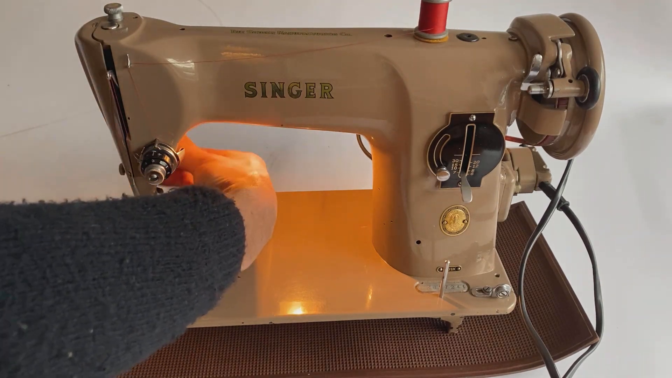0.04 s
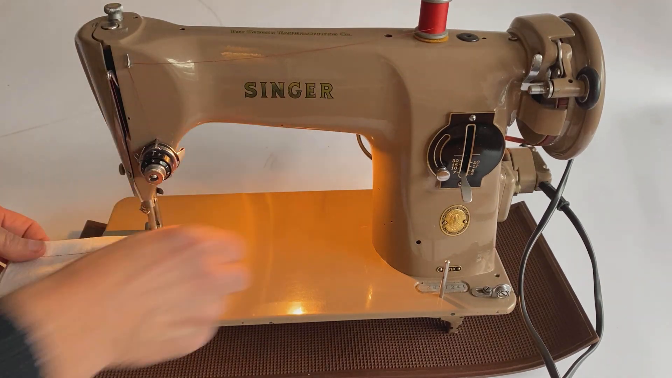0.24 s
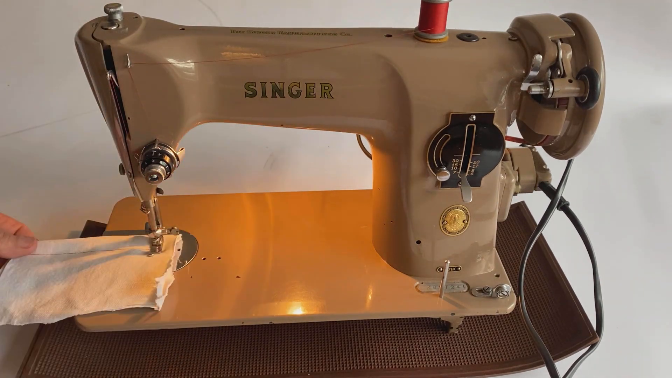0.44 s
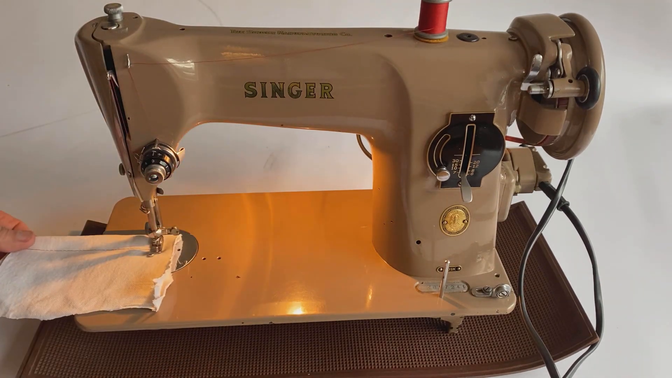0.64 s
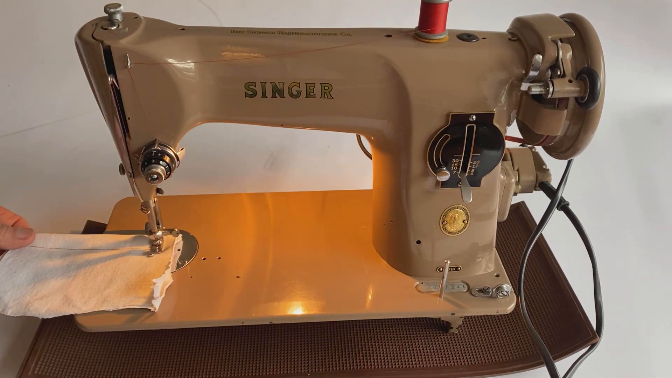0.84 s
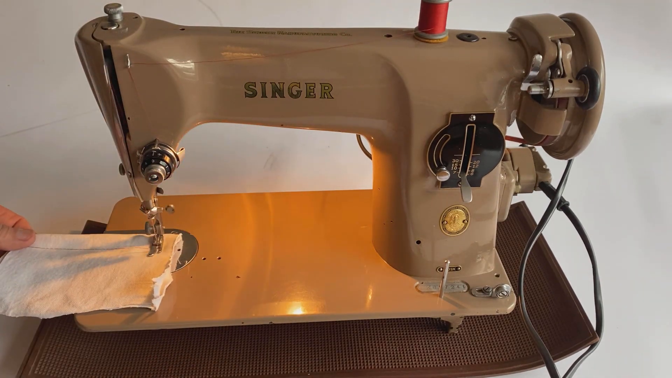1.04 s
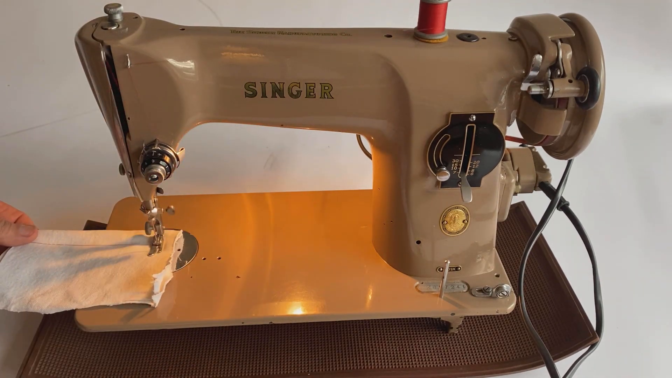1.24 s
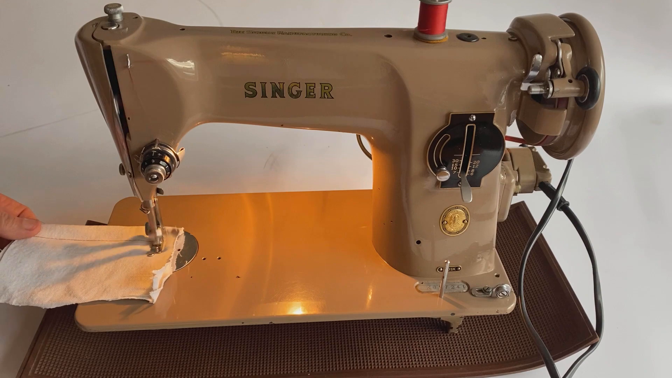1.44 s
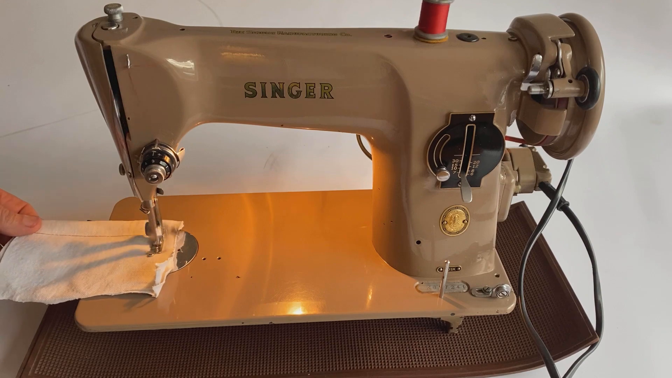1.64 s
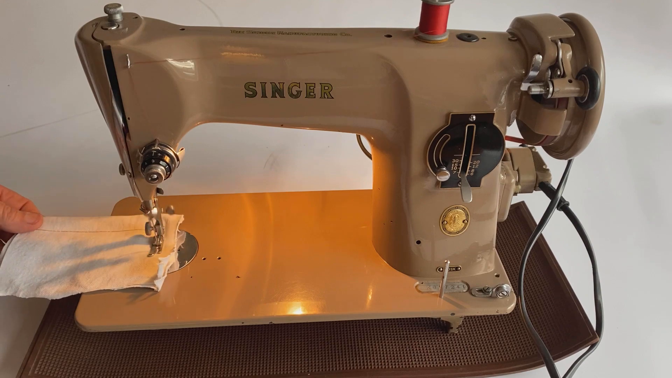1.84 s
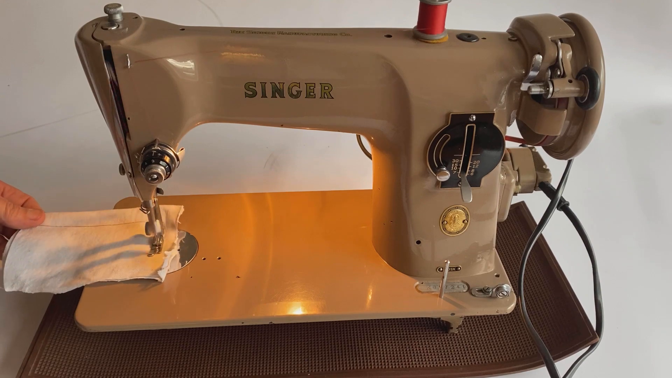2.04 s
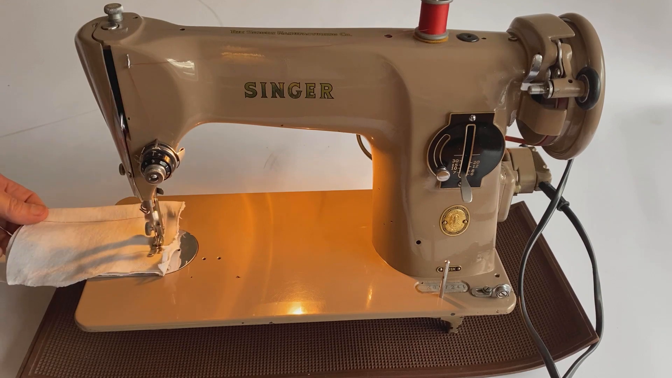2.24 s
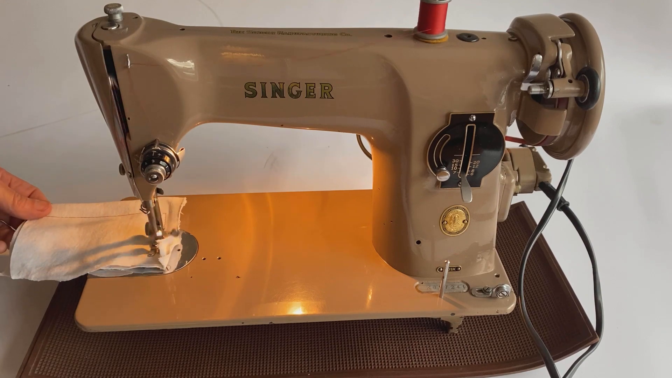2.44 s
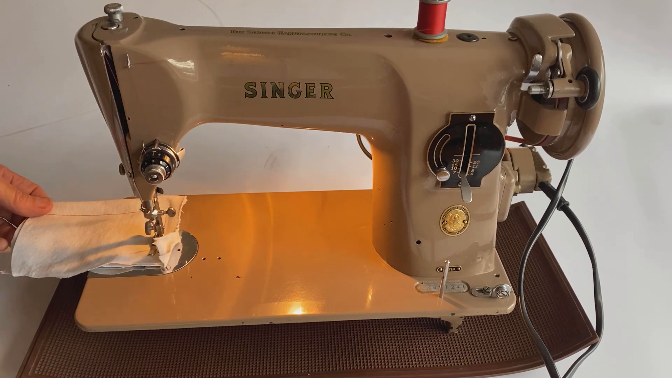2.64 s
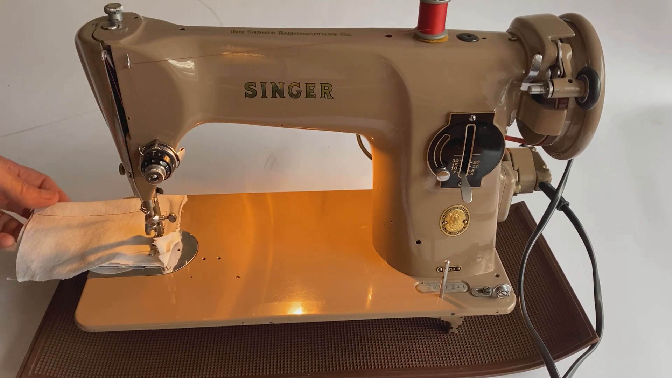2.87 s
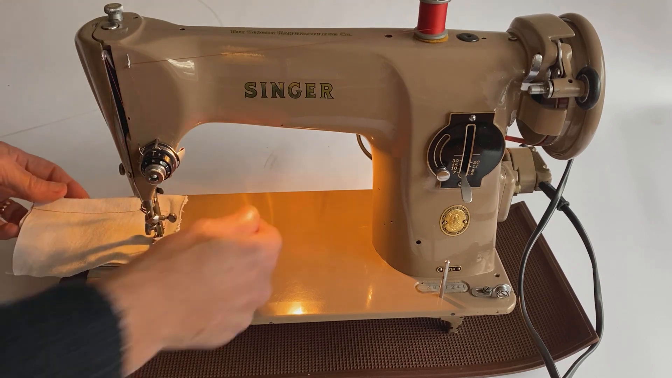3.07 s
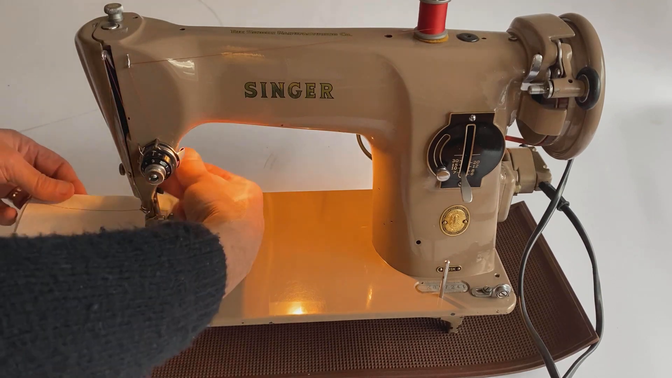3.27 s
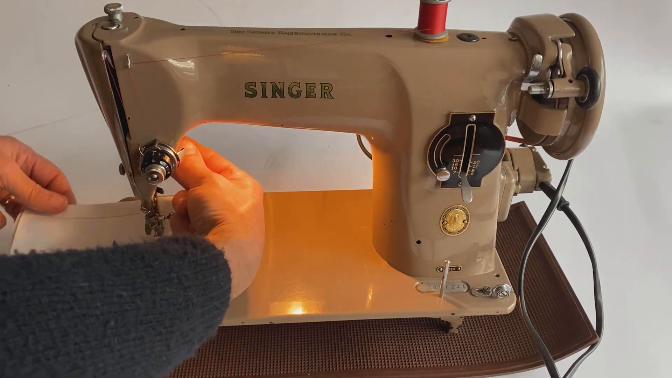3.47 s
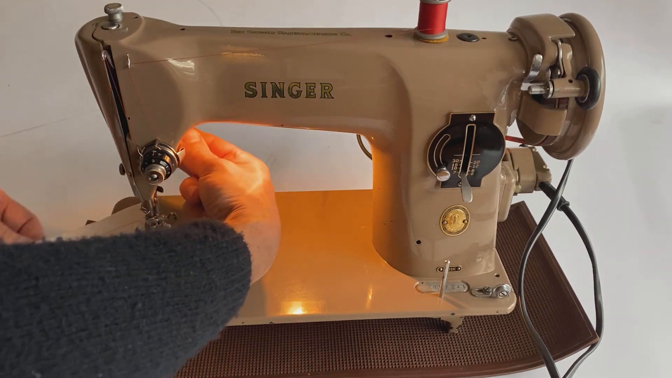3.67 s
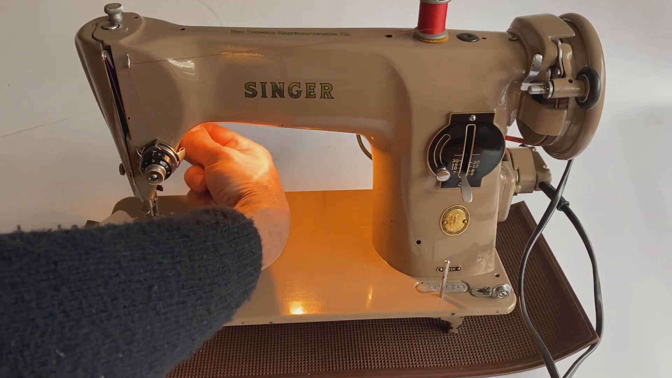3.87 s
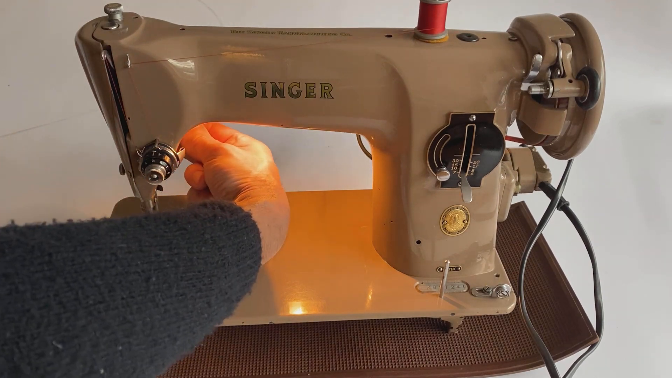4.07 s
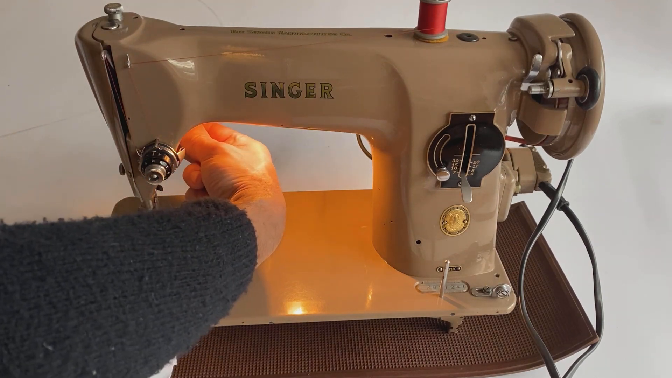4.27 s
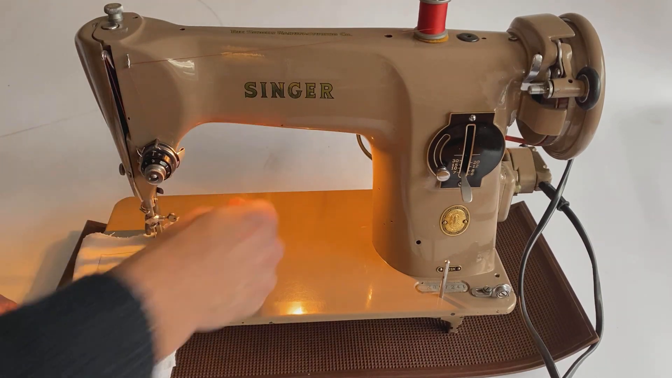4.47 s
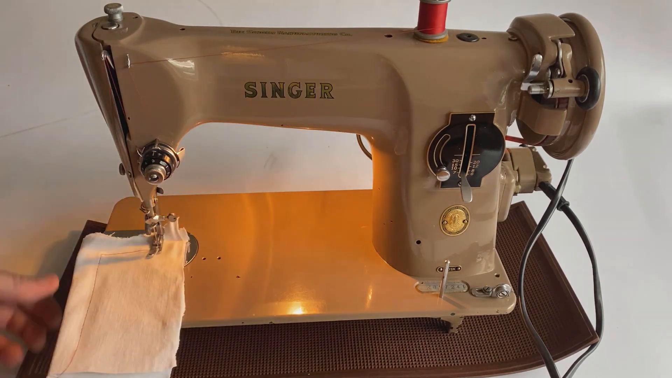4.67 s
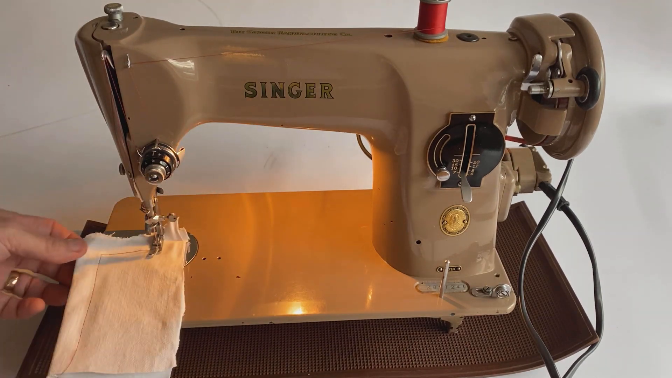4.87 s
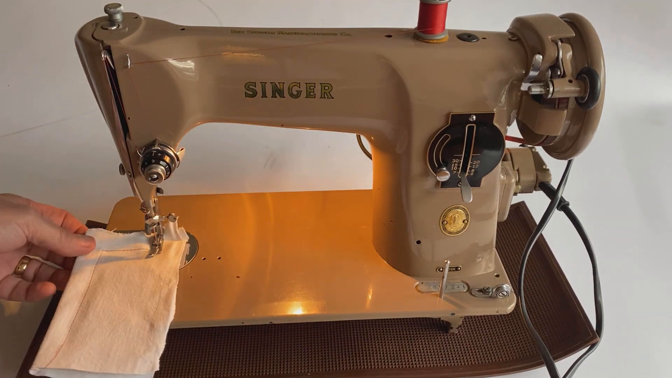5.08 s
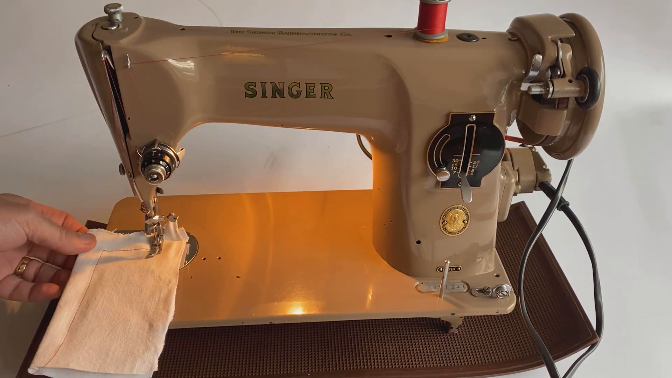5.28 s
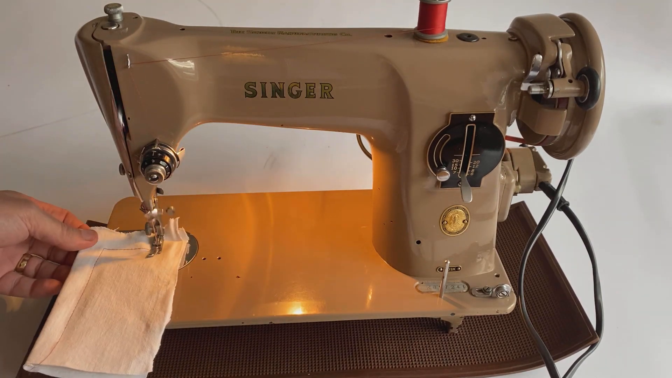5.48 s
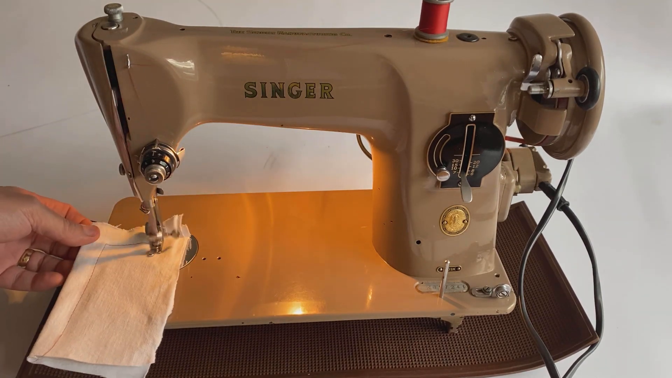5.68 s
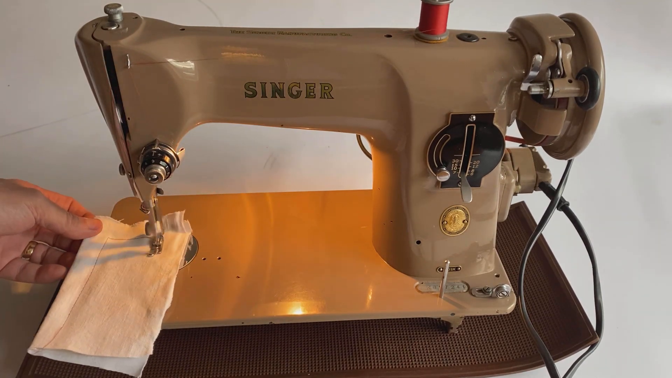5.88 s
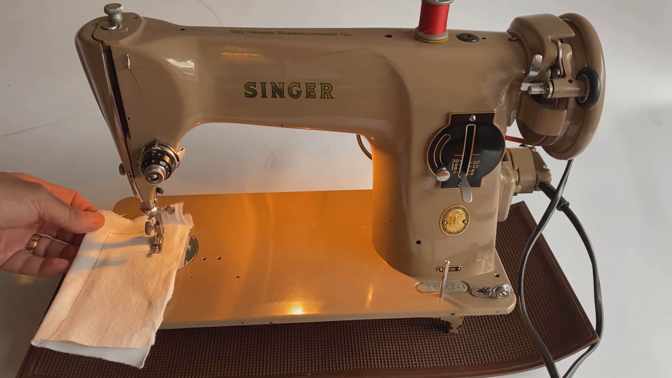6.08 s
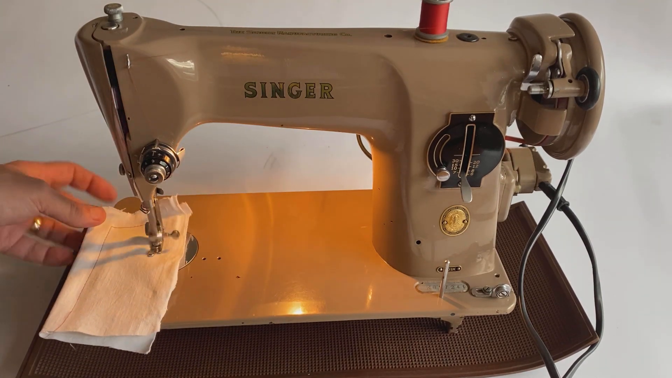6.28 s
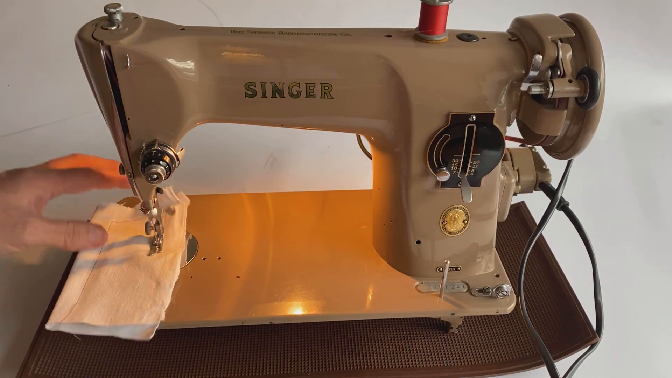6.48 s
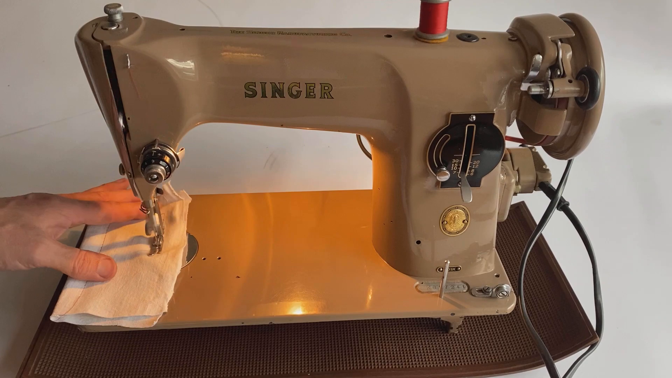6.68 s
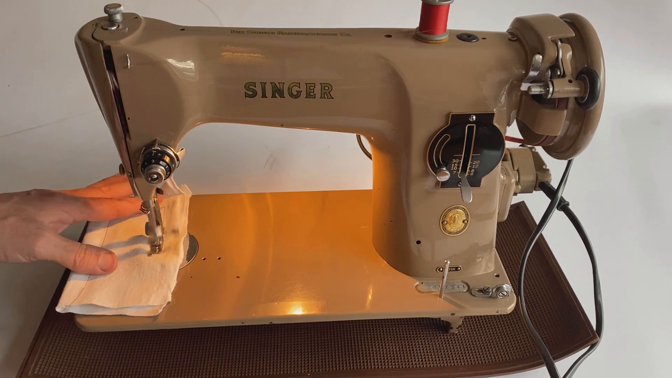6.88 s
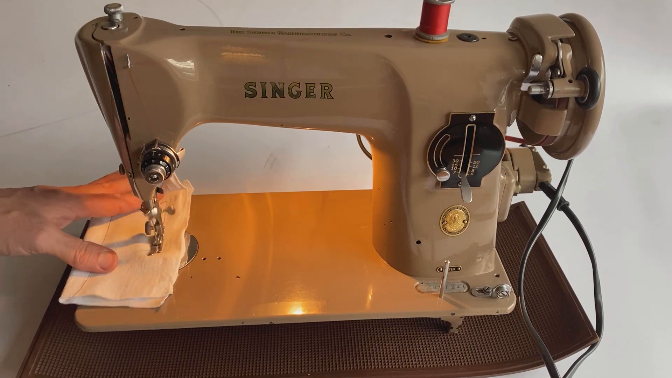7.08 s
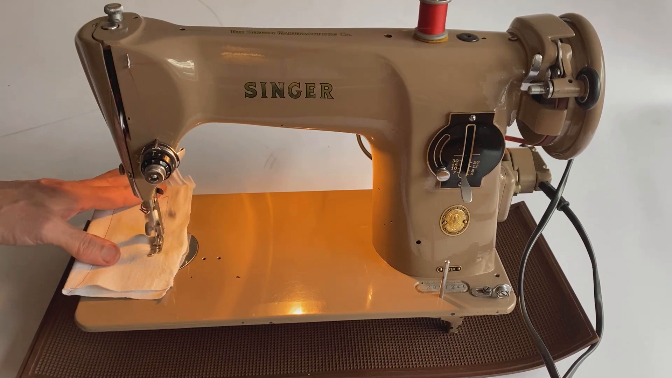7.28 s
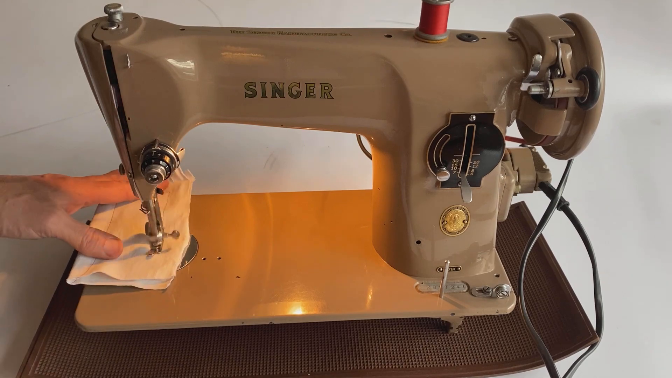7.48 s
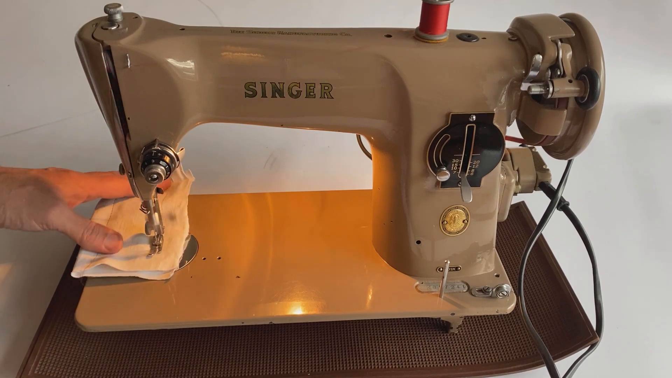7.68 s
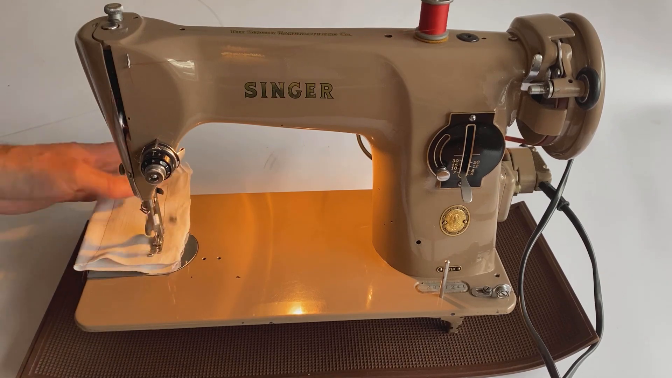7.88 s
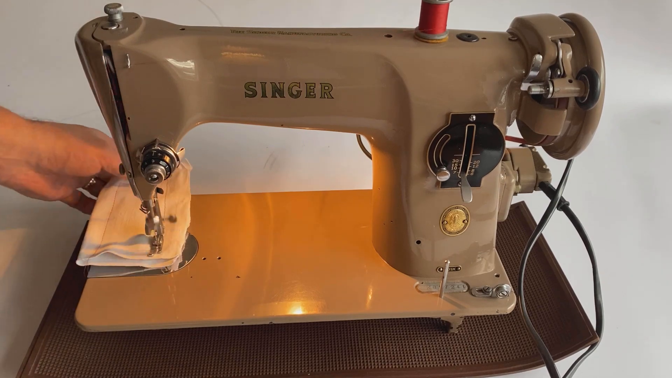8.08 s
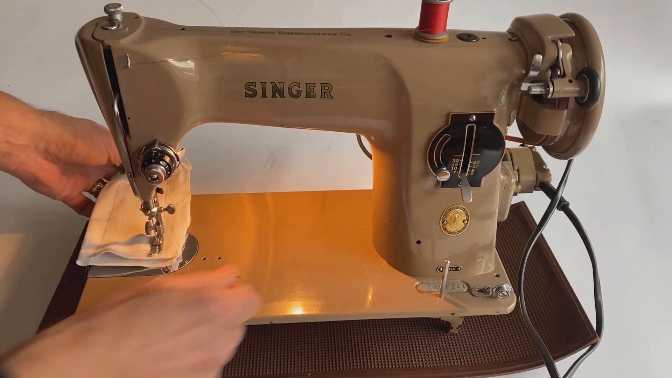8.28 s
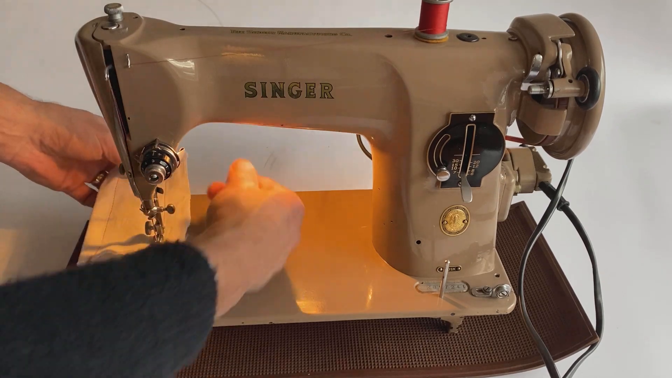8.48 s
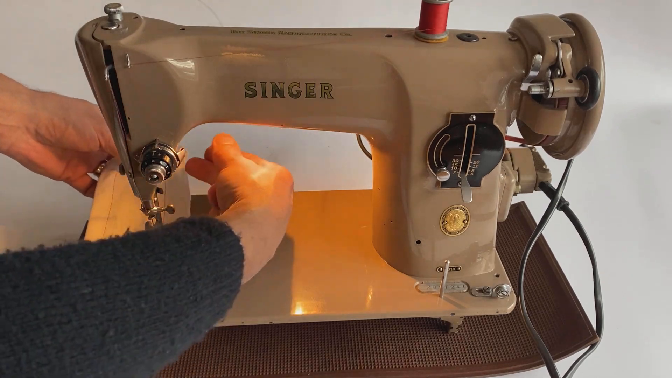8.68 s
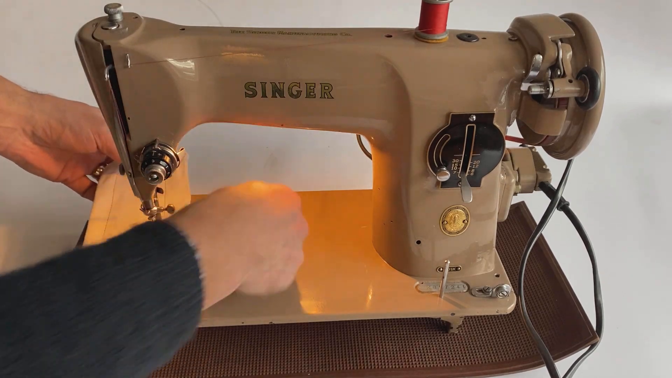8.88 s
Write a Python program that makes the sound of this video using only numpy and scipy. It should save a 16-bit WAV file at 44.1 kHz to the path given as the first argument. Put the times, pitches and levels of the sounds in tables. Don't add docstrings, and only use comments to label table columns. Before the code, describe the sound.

In a small room, heard close in stereo, a hand bumps a metal sewing machine bed and a lever clacks. A switch clicks and a short seam gathers speed with needle ticks, table thumps, gear rattle and motor whir, then snaps off and coasts down. Soft handling and cloth rustle follow, then a longer, faster seam, a loud release snap, a rundown and cloth drawn away.

```python
import sys
import numpy as np
from scipy import signal
from scipy.fft import rfft, irfft, next_fast_len
from scipy.io import wavfile
from scipy.ndimage import uniform_filter1d

SR = 44100
rng = np.random.default_rng(int(sys.argv[2]) if len(sys.argv) > 2 else 0)


def digitize_waveform(pressure):
    field = np.atleast_2d(pressure).T
    bounded = np.clip(field, -1, 1)
    quanta = np.round(bounded * 32767).astype(np.int16)
    wavfile.write(sys.argv[1], SR, quanta)


def attenuation_scalar(level_db):
    decades = np.asarray(level_db, float) / 20
    return 10 ** decades


N = 393372
SIZE = next_fast_len(N)
FULL_SPEED = 13

# (power on [s], power off [s], strain ends [s], buzz level [dB])
PEDAL = [
    (0.829, 2.261, 1.9, -48.5),
    (5.34, 7.842, 5.85, -42.5),
]
# (time [s], tick level [dB], lower ring re tick [dB])
TICKS = [(0.9703, -35.5, -13), (1.115, -29, -8), (1.3019, -26.5, -15.5), (1.454, -20, -15.5),
         (1.5627, -22.5, -12), (1.6617, -29.5, -14.5), (1.6646, -19, -25), (1.7544, -21, -12),
         (1.8412, -27, -12), (1.926, -24.5, -13), (2.0083, -25.5, -12.5), (2.0888, -26, -14),
         (2.126, -28, -14.5), (2.156, -21, -19), (2.1744, -17, -9.5), (2.2373, -20, -23.5),
         (2.3305, -23, -18), (2.4504, -24.5, -16), (2.6572, -29.5, -9), (2.713, -37, -11),
         (5.3707, -32.5, -14), (5.5194, -30.5, -13), (5.56, -30, -4.5), (5.6978, -26.5, -10.5),
         (5.8055, -25.5, -13.5), (5.894, -32, -9), (5.9796, -32.5, -3.5), (6.0701, -24, -8.5),
         (6.1511, -30, -12), (6.2324, -30, -8), (6.3133, -33, -2.5), (6.3295, -31, -6.5),
         (6.3931, -22.5, -17.5), (6.4691, -25.5, -7), (6.4746, -25.5, -10), (6.5533, -21, -14),
         (6.6234, -23.5, -13), (6.6989, -26, -14.5), (6.7615, -30, -14.5), (6.7768, -24.5, -15.5),
         (6.8495, -27, -11.5), (6.929, -20.5, -19.5), (7.001, -24, -16.5), (7.0593, -26, -14.5),
         (7.0751, -28.5, -11), (7.1506, -31.5, -10), (7.233, -22.5, -20), (7.2963, -22, -11),
         (7.3761, -18, -15), (7.4456, -22.5, -15.5), (7.5195, -20, -15.5), (7.5946, -27, -4.5),
         (7.6648, -23, -13.5), (7.736, -22, -15), (7.7511, -23.5, -18), (7.8134, -28, -6),
         (7.8898, -30.5, -1), (7.9881, -32.5, -6.5), (8.114, -24.5, -12.5), (8.1984, -35, -17.5)]
# (frequency [Hz], density [dB per Hz])
FIZZ = [(6000, -19.5), (8500, -5.5), (10000, -4), (12500, -1.5), (14000, -4.5), (15500, -19), (17000, -44)]
# (level at full speed [dB], slope under power [dB per dB of speed],
# slope coasting [dB per dB of speed], step at power off [dB])
BRUSHES = (-42, 0.45, 0.48, 5.5)


def evened(x):
    return x / np.sqrt(np.mean(x ** 2) + 1e-20)


def read(points, hz):
    f, value = np.transpose(points)
    return np.interp(np.log(hz + 1), np.log(f + 1), value)


def coloured(x, points, peaks=()):
    hz = np.fft.rfftfreq(SIZE, 1 / SR)
    lift = 1 + sum(attenuation_scalar(top_db) / np.sqrt(1 + (2 * (hz - f) / w) ** 4) for f, w, top_db in peaks)
    spectrum = rfft(x, SIZE) * attenuation_scalar(read(points, hz)) * lift
    return evened(irfft(spectrum, SIZE)[:N])


def train(seconds, gains):
    out = np.zeros(N)
    at = np.clip(np.round(seconds * SR).astype(int), 0, N - 1)
    np.add.at(out, at, gains)
    return out


def grains(per_s, spread_db, smooth):
    draws = rng.random((12000 * N // SR, 3))
    at, size, sign = draws[:int(min(per_s, 12000) * N / SR)].T
    height = attenuation_scalar(spread_db * np.minimum(-np.log(size + 1e-9), 5))
    knocks = train(at * N / SR, height * np.sign(sign - .5))
    return evened(knocks) + smooth * rng.standard_normal(N)


def ring(modes, rise):
    t = np.arange(SR // 3) / SR
    x = sum(attenuation_scalar(db - 60 * t / t60) * np.sin(2 * np.pi * hz * t) for hz, db, t60 in modes)
    x = x * (1 - np.exp(-t / rise))
    return x / abs(x).max()


def struck(blows, response):
    return signal.oaconvolve(blows, response)[:N]


def bursts(seconds, db, rise, t60):
    t = np.arange(SR // 5) / SR
    shape = (1 - np.exp(-t / rise)) * attenuation_scalar(-60 * t / t60)
    shape = shape / shape.max()
    out = np.zeros(N + len(t))
    for at, gain in zip(np.round(seconds * SR).astype(int), attenuation_scalar(db) * np.ones(len(seconds))):
        out[at:at + len(t)] += gain * shape
    return out[:N]


def shaft():
    # (time [s], speed [stitches per s])
    seam_speeds = [
        [(.84, 2.483), (1.252, 4.848), (1.456, 8.037), (1.63, 10.419), (1.991, 12.276), (2.264, 12.629),
         (2.395, 8.6), (2.56, 4.4), (3.0, .03)],
        [(5.33, 4.458), (5.67, 6.398), (5.772, 10.194), (6.101, 12.167), (6.67, 13.278), (7.877, 13.671),
         (8.07, 6.4), (8.2, 3.8), (8.64, .03)],
    ]
    first_counts = (-.076, 15.685)
    # (first seam [dB], second seam [dB])
    slack_db = (3, -6)
    slack_s, take_up_s, let_go_s = 0.041, 0.016, 0.061
    t = np.arange(N) / SR
    speed, turn, power, taken, stitches = np.zeros(N), np.zeros(N), np.zeros(N), np.zeros(N), []
    for rows, first, slack, (on, off, *_) in zip(seam_speeds, first_counts, slack_db, PEDAL):
        rows = np.transpose(rows)
        run = (t >= rows[0, 0]) & (t < rows[0, -1])
        speed[run] = np.interp(t[run], *rows)
        turn[run] = first + np.cumsum(speed[run]) / SR
        power[run] = np.clip((off - t[run]) / let_go_s + 1, 0, 1)
        whole = np.arange(np.ceil(first), turn[run][-1] + .31)
        stitches.append(np.interp(whole, turn[run], t[run]))
        grip = np.clip((t - on) / take_up_s, 0, 1) * (t < rows[0, -1])
        taken += grip * attenuation_scalar(slack * np.exp(-abs(t - on) / slack_s))
    return speed, turn, power, taken, np.hstack(stitches)


def law(layer, wake=(1, 1, 0), hush=1):
    stall_speed, stall_db = 2.07, -10
    speed, _, power, taken, _ = shaft()
    full_db, pull, coast, step_db = layer
    octaves = np.log2(speed / FULL_SPEED + 1e-6)
    lift_db = wake[2] * np.exp(-((octaves - np.log2(wake[0] / FULL_SPEED)) / wake[1]) ** 2)
    speed_db = 20 * np.log10(2) * octaves
    loss_db = hush * stall_db * (stall_speed / (speed + .1)) ** 2
    driven_db = power * pull * speed_db
    coasting_db = (1 - power) * (coast * speed_db + step_db)
    return taken * attenuation_scalar(full_db + loss_db + lift_db + driven_db + coasting_db)


def lurch(order):
    # (time [s], width [s], gears [dB], brushes [dB])
    lurches = [
        (1.0, 0.14, 1.5, 5),
        (1.42, 0.028, 3, 0),
        (5.376, 0.016, -1, 8),
        (5.455, 0.032, -2.5, -22),
        (5.56, 0.18, 3, 3),
    ]
    t = np.arange(N) / SR
    return attenuation_scalar(sum(row[order] * np.exp(-((t - row[0]) / row[1]) ** 2) for row in lurches))


def gear_drive():
    # (level at full speed [dB], slope under power [dB/dB], slope coasting [dB/dB], step at power off [dB])
    gear_law = (-32.5, 0.47, 0.58, -1.5)
    return law(gear_law, hush=2.1) * lurch(order=2)


def spin(turn):
    return 1 + 0.12 * np.cos(2 * np.pi * 9.0 * turn)


def stitch_load(turn):
    twice = 0.031 * np.cos(4 * np.pi * (turn - .1))
    once = 0.029 * np.cos(2 * np.pi * (turn - .3))
    return 1 + twice + once


def mesh():
    drift = uniform_filter1d(uniform_filter1d(rng.standard_normal(N), size=700), size=500)
    return attenuation_scalar(1.6 * evened(drift))


def gears(turn, drive):
    # (frequency [Hz], density [dB per Hz])
    rattle = [(180, -38), (300, -4.5), (354, -6.5), (510, -8.5), (1120, -8.5), (1220, -13), (1460, -4.5),
              (2950, -10), (3400, -19), (4200, -32), (5460, -50.5), (9240, -120)]
    # (frequency [Hz], width [Hz], lift [dB])
    casting = [(733, 200, -5), (1110, 120, -5), (1430, 78, -8.5), (2100, 48, -3.5), (2780, 220, -19.5),
               (2867, 280, -7.5)]
    noise = coloured(grains(per_s=1200, spread_db=3.5, smooth=0.55), rattle, casting)
    return attenuation_scalar(2.0) * mesh() * drive ** 1.139 * spin(turn) * stitch_load(turn) * noise


def motor(turn, drive):
    # (order [turns per stitch], level [dB])
    orders = [(3.9, -8), (5.55, -0.5), (11.1, -9.5), (16.65, -1.5), (27.75, -14)]
    # (frequency [Hz], level [dB])
    buzz_lines = [(100, -2.5), (200, -7.5), (400, -5.5)]
    # (full speed [dB], under power [dB/dB], coasting [dB/dB], step at power off [dB])
    housing_law = (-45, 0.13, 0.3, -6)
    # (speed [stitches per s], width [octaves], lift [dB])
    housing_wake = (4.5, 0.55, 9.5)
    # (first seam [s], second seam [s])
    warm_s = (0.08, 0.09)
    t = np.arange(N) / SR
    speed = shaft()[0] / FULL_SPEED
    whir = sum(attenuation_scalar(db) * np.sin(2 * np.pi * k * turn) for k, db in orders)
    strain, warm = np.zeros(N), np.ones(N)
    for (on, _, eased, db), build_s in zip(PEDAL, warm_s):
        strain += attenuation_scalar(db) * np.clip((t - on) / 0.1, 0, 1) ** 2 * np.clip((eased - t) / 0.17, 0, 1)
        warm *= np.where(t < on, 1, np.clip((t - on) / build_s, 0, 1) ** 2)
    buzz = sum(attenuation_scalar(db) * np.sin(2 * np.pi * hz * t) for hz, db in buzz_lines)
    buzz = buzz * (1 + 0.35 * np.sin(2 * np.pi * 3.0 * turn))
    housing = coloured(rng.standard_normal(N), [(200, -32.5), (300, 0), (450, -2), (600, -29.0)],
                       [(350.2, 18, 13), (470.7, 39, 5.0)])
    drone = warm * law(housing_law, housing_wake) * housing
    return attenuation_scalar(-7.0) * drive * speed ** 6.0 * whir + attenuation_scalar(3.0) * strain * buzz + drone


def bearings(turn, power):
    # (level at full speed [dB], slope under power [dB/dB], slope coasting [dB/dB], step at power off [dB])
    singing_law = (-37, 0.5, 0.33, -17)
    # (speed [stitches per s], width [octaves], lift [dB])
    bearing_wake = (2.7, 0.85, 14.5)
    # (frequency [Hz], width [Hz], lift [dB])
    bearing_peaks = [(1400, 37, 8.5), (2050, 70, 9), (2558, 110, 20), (2680, 120, 18.5), (2856, 80, 23),
                     (3075, 140, 11)]
    driven = power * law(singing_law) * lurch(order=2)
    coasting = (1 - power) * law(singing_law, bearing_wake, hush=0.4)
    noise = coloured(rng.standard_normal(N), [(100, -0.5), (4000, -5.5), (6000, -45.0)], bearing_peaks)
    return (driven + coasting) * stitch_load(turn) * mesh() * noise


def linkage_and_brushes(turn):
    # (level at full speed [dB], slope under power [dB/dB], slope coasting [dB/dB], step at power off [dB])
    linkage_law = (-40, 0.92, 0.77, -2.5)
    # (frequency [Hz], density [dB per Hz])
    hiss_spectrum = [(2500, -34.5), (3400, -1), (4000, -1.5), (5200, -1), (6500, -2), (8300, -6.5),
                     (9500, -10), (11000, -31)]
    s, tick_db, low_db = np.transpose(TICKS)
    hiss = law(linkage_law) * spin(turn) + bursts(s, tick_db + low_db - 8.5, 0.00098, 0.076)
    fizz = law(BRUSHES) * lurch(order=3) * spin(turn)
    fizz += bursts(s - .004, tick_db - 19.5, 0.0037, 0.076) + bursts(s, tick_db - 39.5, 0.0022, 0.24)
    out = np.zeros(N)
    for gain, spectrum in ((fizz, FIZZ), (hiss, hiss_spectrum)):
        out += gain * coloured(grains(per_s=5000, spread_db=2.5, smooth=0.093), spectrum)
    return out


def free_brushes():
    # (frequency [Hz], density [dB per Hz])
    sparkle = [(13200, -40.5), (14300, 0.5), (14900, -3.5), (15300, -39)]
    return attenuation_scalar(-19) * (1 - shaft()[2]) * law(BRUSHES) * coloured(rng.standard_normal(N), sparkle)


def bent(modes, u):
    return [(hz * (1 + 0.036 * (u - .5)), db, t60) for hz, db, t60 in modes]


def needle():
    # (frequency [Hz], level [dB], t60 [s])
    needle_top = [(13600, -3.5, 0.0091), (12000, -5.5, .006), (13600, -12, 0.0027), (11220, -10.5, 0.008)]
    needle_low = [(7180, -2.5, 0.008), (5300, -5, .01), (4240, -2.5, 0.012), (7900, -9, .006)]
    out, draws = np.zeros(N), rng.random((len(TICKS), 8))
    for (s, db, low_db), u in zip(TICKS, draws):
        tick = ring(bent(needle_top, u[0]), 0.0005)
        tick = tick + attenuation_scalar(low_db + 7.5) * ring(bent(needle_low, u[1]), 0.00058)
        chatter = [(0, 0), (-.005 * u[2], -11 - 6 * u[3]),
                   (0.0044 * u[4], -11 - 6 * u[5]), (.018 * u[6], -14 - 6 * u[7])]
        for late, loose_db in chatter:
            out[round((s + late) * SR):][:len(tick)] += attenuation_scalar(db + loose_db - 2.5) * tick
    return out


def strokes():
    # (level at full speed [dB], slope under power [dB/dB], slope coasting [dB/dB], step at power off [dB])
    thump_law = (-23, 1.37, 1.54, 0.5)
    # (time [s], thump [dB], upper table modes [dB])
    uneven = [(1.352, 0, -1), (1.487, 7.5, -0.5), (1.594, 11.5, -5), (1.692, -1.5, 2), (1.783, 4, -2),
              (1.87, 6.5, -2), (1.955, -5.5, 3), (2.036, -1, 1), (2.117, -12.5, -1.5), (2.196, 6.5, -9.5),
              (2.37, -2, -2), (2.499, 8.5, -0.5), (2.76, -16, 1.5), (5.584, -2, 3.5), (5.832, 4, -6),
              (5.925, 0, 4), (6.012, -1, 2), (6.097, 3, -3), (6.179, -2.5, -2.5), (6.259, 6.5, -1),
              (6.338, 6, -1), (6.417, 4, -11), (6.495, 1.5, -7.5), (6.571, 1, 1.5), (6.648, 3.5, -3.5),
              (6.724, 0, -2.5), (6.8, 0, 1), (6.874, 6, -2.5), (6.949, -1.5, 5.5), (7.024, -2.5, 3),
              (7.098, 2, 0), (7.172, -7, 0), (7.246, 2, -2.5), (7.32, 6.5, -1.5), (7.394, 3, -1.5),
              (7.468, -6, 3), (7.542, -3.5, 2.5), (7.615, 2.5, 1), (7.689, 1, 0), (7.762, -7, 0.5),
              (7.916, 0.5, 0.5), (8.005, -9.5, 0.5), (8.167, 9.5, 2.5), (8.64, -13, 0)]
    times, rows = shaft()[4], np.array(uneven)
    extra_db = np.zeros((len(times), 2))
    extra_db[abs(times[:, None] - rows[:, 0]).argmin(0)] = rows[:, 1:]
    gain = law(thump_law)[np.round(times * SR).astype(int)]
    return times, 20 * np.log10(gain + 1e-9) + extra_db[:, 0], extra_db[:, 1] - 2


def table():
    # (time [s], thump [dB], upper modes re thump [dB], legs re thump [dB])
    bumps = [
        (0.125, -38.5, -3.5, -4.5),
        (0.194, -43.5, 5.5, -5.5),
        (0.685, -47.5, 3.5, -1),
        (3.398, -36.5, -6, -18.5),
        (4.423, -35, -0.5, -30),
        (4.953, -45, -2.5, 6),
        (4.988, -61, 13.5, 12),
        (5.208, -58, 14, 5),
        (5.453, -36.5, -5, -30),
        (8.305, -50, 12.5, -30),
    ]
    # (frequency [Hz], level [dB], t60 [s])
    table_modes = [(101, -35.5, 0.25), (142.7, 4.5, 0.27), (183.6, 6.5, 0.1), (239.6, 4.5, 0.21),
                   (268.3, -9, 0.39), (354.5, -10, 0.31)]
    # (level at full speed [dB], slope under power [dB/dB], slope coasting [dB/dB], step at power off [dB])
    rumble_law = (-30.5, 0.66, 0.37, 1)
    out = np.zeros(N)
    for (s, db, upper_db), late in ((strokes(), .004), (np.transpose(bumps)[:3], .001)):
        for modes, level_db in ((table_modes[:2], db - 2.5), (table_modes[2:], db + upper_db - 0.6)):
            blows = train(s + late, attenuation_scalar(level_db))
            blows += train(s + .034, 0.063 * attenuation_scalar(level_db))
            out += struck(blows, ring(modes, 0.0036))
    s, db, _, legs_db = np.transpose(bumps)
    legs = ring([(67.0, -1, 0.32), (85.2, -0.5, 0.2)], 0.0075)
    out += struck(train(s, attenuation_scalar(db + legs_db - 0.5)), legs)
    shake = struck(grains(per_s=130, spread_db=4.0, smooth=0.12), ring(table_modes, 0.002))
    return out + attenuation_scalar(-4.5) * law(rumble_law) * evened(shake)


def clacks(rows, modes):
    # (frequency [Hz], level [dB], t60 [s])
    crack_modes = [(3270, -6.5, 0.024), (4000, -11.5, .012), (4190, 12.5, 0.0058), (4940, 2, 0.0086),
                   (5400, 1, .006), (7640, 4, 0.0043), (6900, -7, 0.0095), (11400, -15, 0.0054)]
    s, db, crack_db = np.transpose(rows)
    body = struck(train(s, attenuation_scalar(db - 6.0)), ring(modes, 0.00098))
    return body + struck(train(s, attenuation_scalar(db + crack_db - 2.0)), ring(crack_modes, 0.00047))


def presser_lever():
    # (time [s], ring [dB], crack re ring [dB])
    lever_moves = [
        (0.195, -28, -35),
        (0.26, -35.5, -39.5),
        (4.474, -30.5, -40),
    ]
    # (frequency [Hz], level [dB], t60 [s])
    lever_modes = [(473, -3, 0.28), (648, 6.5, 0.057), (939.7, 16, 0.046), (2000, 8.5, 0.01806),
                   (2063, -6, 0.1)]
    return clacks(lever_moves, lever_modes)


def foot_switch():
    # (time [s], ring [dB], crack re ring [dB])
    snaps = [(.688, -36, 10.5), (.695, -56.5, -1), (.831, -29, -21), (.8412, -27, 12.5), (2.486, -32.5, 5),
             (2.656, -47, 8), (2.675, -45, 7), (3.343, -44.5, -25), (5.097, -40.5, -25),
             (5.2125, -28, -4.5), (5.2795, -28, -22), (5.334, -31.5, -18)]
    # (frequency [Hz], level [dB], t60 [s])
    switch_modes = [(662, 0, 0.099), (755, 1.5, 0.07), (1100, -6.5, 0.042), (1600, -11, .03),
                    (2090, -14, .04), (2530, -15.5, 0.022)]
    # (time [s], ring [dB], crack re ring [dB])
    releases = [
        (2.2825, -9.5, -3),
        (7.8414, -12, 7),
        (7.849, -32, 6),
    ]
    # (frequency [Hz], level [dB], t60 [s])
    release_modes = [(673, 1, 0.078), (763, -7.5, 0.14), (1116, -5.5, 0.09), (1370, -9.5, 0.021),
                     (2050, -2.5, 0.045), (2400, -13.5, 0.037), (3810, -16, .05)]
    return clacks(snaps, switch_modes) + clacks(releases, release_modes)


def rubs():
    # (time [s], level [dB], rise [s], t60 [s], brightness [0-1])
    scuffs = [(.083, -52, .003, 0.22, 0.8), (.194, -35, 0.0013, 0.11, 0.7), (.221, -46, .001, .04, 0.7),
              (.678, -45, 0.0097, 0.13, 0.3), (0.685, -32, 0.0011, 0.22, 0.47),
              (0.817, -37.5, .001, 0.026, 0.8), (.83, -28, 0.0022, 0.36, 0.5),
              (3.19, -57.5, .004, .25, 0.8), (3.397, -48, 0.0013, 0.1, 0),
              (3.657, -50.5, .0011, 0.055, 0.8), (3.66, -53.5, .01, 0.64, 0.4),
              (4.04, -62.5, .01, .25, 0.71), (4.19, -60, .005, .3, 0.4), (4.39, -50.5, .008, 0.22, 0.3),
              (4.41, -48.5, .004, 0.091, .36), (4.471, -42, .0011, 0.057, 0.6),
              (4.476, -50.5, .003, .2, 0.2), (5.095, -48, 0.002, .1, 0), (5.2077, -35.5, 0.00065, 0.054, 0),
              (5.213, -29.5, 0.00084, 0.17, 0), (5.278, -36.5, 0.0011, 0.13, 0),
              (5.315, -37, 0.0009, 0.033, 0.9), (5.325, -39, .002, 0.25, .6),
              (7.842, -11, 0.0011, 0.098, 0.6), (8.419, -39, 0.0014, 0.14, 1)]
    # (frequency [Hz], density [dB per Hz])
    rub_spectrum = [(240, -47), (400, -9), (748, -3.5), (1570, -11), (2620, -12), (4760, -22), (7090, -27),
                    (9160, -30.5), (12000, -44.5), (15600, -60.5), (22000, -120)]
    out, fibres = np.zeros(N), grains(per_s=3000, spread_db=2.5, smooth=.7)
    dull = coloured(fibres, rub_spectrum, [(714, 29, 0.0038), (2050, 150, 0.0036)])
    bright = coloured(np.gradient(fibres), rub_spectrum)
    t = np.arange(SR // 4) / SR
    contact = 1 + 2.4 * np.exp(-t / 0.0028)
    for s, db, rise, t60, shine in scuffs:
        start, shine = round(s * SR), np.clip(shine, 0, 1)
        span = slice(start, start + len(t))
        shape = (1 - np.exp(-t / abs(rise))) * attenuation_scalar(db - 11.0 - 60 * t / abs(t60)) * contact
        out[span] += shape * ((1 - shine) * dull[span] + shine * bright[span])
    return out


def scrapes():
    # (time [s], level [dB], rise [s], t60 [s], centre [Hz])
    scrape_rows = [(0.067, -61.5, 0.0065, 0.32, 1037), (0.082, -66.5, .02, .4, 1924),
                   (0.202, -62, .003, 0.2, 2050), (0.691, -49, 0.0024, 0.16, 1172),
                   (0.697, -51.5, .01, 0.2, 3500), (.845, -40, .004, 0.19, 4330),
                   (2.455, -40, .003, .06, 955), (2.485, -42, .002, .05, 2700),
                   (2.558, -43, .002, .05, 1800), (2.656, -40, .002, .04, 1750),
                   (2.674, -41, 0.0019, 0.06, 1060), (2.715, -48, .002, .05, 1450),
                   (3.16, -69, .01, .2, 3400), (3.2, -71, .01, 0.26, 890), (3.338, -55, .004, 0.077, 7130),
                   (3.345, -60, .002, 0.13, 690), (3.393, -68, .002, .12, 3550),
                   (3.394, -54, 0.0018, 0.07, 1050), (3.9, -67, 0.016, 0.24, 2300),
                   (3.68, -69, .02, 0.53, 750), (4.16, -74, 0.027, 0.39, 3100),
                   (4.183, -70, 0.0088, 0.33, 950), (4.405, -57, 0.0051, 0.13, 644),
                   (4.48, -62, .004, 0.33, 975), (4.955, -71, 0.003, 0.2, 2130),
                   (4.956, -63, .004, .15, 680), (4.99, -66.5, 0.0028, .12, 1180),
                   (4.6, -70.5, 0.0027, 0.31, 750), (5.215, -44, .002, 0.22, 730),
                   (5.279, -43, .001, .03, 1800), (5.281, -54, .002, 0.33, 694),
                   (5.335, -44, .01, 0.25, 694), (5.39, -45, .002, .04, 4500),
                   (5.518, -31, .006, .07, 2500), (7.851, -27, .004, 0.2, 2230),
                   (7.868, -25.5, 0.0016, 0.051, 2700)]
    relative_width = 0.12
    out, t = np.zeros(N), np.arange(SR // 4) / SR
    fibres = grains(per_s=4800, spread_db=1, smooth=.6)
    for s, db, rise, t60, hz in scrape_rows:
        start = round(s * SR)
        span = slice(start, start + len(t))
        band = signal.lfilter(*signal.iirpeak(hz, 1 / relative_width, SR), fibres[span])
        out[span] += (1 - np.exp(-t / abs(rise))) * attenuation_scalar(db - 60 * t / abs(t60)) * evened(band)
    return out


def cloth():
    cloth_moves = [
        (.19, 0.067, 0.39, -65, -3),
        (.8, 0.043, .05, -70.5, -9),
        (3.2, 0.28, 0.59, -72, -1.5),
        (4.47, 0.12, 0.56, -70.5, -2.5),
        (5.02, 0.17, 0.25, -73, -6),
        (5.21, 0.026, 0.089, -67, -25.5),
        (5.32, 0.0178, .02, -54.5, -14),
        (8.5, .05, 0.36, -69.5, -2.5),
        (8.92, 0.14, 0.084, -76, -3.5),
    ]
    # (frequency [Hz], density [dB per Hz])
    rustle = [(240, -43), (400, -3), (947, -14), (1100, -14), (1390, -12.5), (7390, -19), (8890, -14),
              (9500, -37.5), (12400, -58), (20900, -120)]
    swish_db, rest_db, rest_top_db = 15, -80, -5.5
    t, body, top = np.arange(N) / SR, attenuation_scalar(rest_db), attenuation_scalar(rest_db + rest_top_db)
    for s, rise, fall, db, top_db in cloth_moves:
        swish = attenuation_scalar(db - swish_db * np.maximum((s - t) / rise, (t - s) / fall))
        body, top = np.maximum(body, swish), np.maximum(top, swish * attenuation_scalar(top_db))
    crumple = coloured(grains(per_s=2700, spread_db=4.0, smooth=1.2), rustle)
    return body * crumple + top * coloured(rng.standard_normal(N), FIZZ)


def background():
    # (frequency [Hz], density [dB per Hz])
    drone_spectrum = [(12, -68.5), (20, -34), (34, -6.5), (48, 0.5), (66, -6.5), (73, 0), (81, -19.5),
                      (110, -21.5), (140, -68), (240, -120)]
    room_spectrum = [(53, -42), (90, 0.5), (203, 5.5), (297, -12), (335, -8.5), (456, -21.5), (510, -31.5),
                     (700, -28.5), (910, -37), (1540, -120)]
    # (level at full speed [dB], slope under power [dB/dB], slope coasting [dB/dB], step at power off [dB])
    drone_law = (-49.5, 0.5, 3, -5.5)
    hum_hz, hum_db, idle_drone_db, room_db = 54.2, -58.5, -64.5, -63.5
    drone = attenuation_scalar(-6.0) * (attenuation_scalar(idle_drone_db) + law(drone_law)) * coloured(rng.standard_normal(N), drone_spectrum)
    hum = attenuation_scalar(hum_db + 2.5) * np.sin(2 * np.pi * hum_hz * np.arange(N) / SR)
    return hum + drone + attenuation_scalar(room_db) * coloured(rng.standard_normal(N), room_spectrum)


def ports(x, wet_db, even):
    # (frequency [Hz], echo re direct [dB])
    echo_levels = [(60, -22.5), (130, -18.5), (290, -4), (640, 2), (1400, -2), (3000, 1.5), (5500, -7.5),
                   (7500, -19.5), (9000, -17), (14000, -16)]
    # (frequency [Hz], lead of the left port [radians])
    phase_lead = [(0, 0), (600, -.6), (1600, 0), (2450, -.8), (2760, -2.6), (3100, -.4), (4200, 0),
                  (5600, -1), (6700, 0), (8950, 3.14), (12350, 6.28), (15300, 9.42), (22050, 17)]
    # (frequency [Hz], left minus right [dB])
    port_tilt = [(60, 3), (130, 1.5), (280, 2), (550, -0.5), (1200, -0.5), (2500, -3), (5000, -4),
                 (9000, 1)]
    t, hz = np.arange(SR // 2) / SR, np.fft.rfftfreq(SIZE, 1 / SR)
    tails = rng.standard_normal((2, len(t))) * attenuation_scalar(-60 * t / .22) * (t > .002)
    wet = attenuation_scalar(read(echo_levels, hz) + wet_db)
    echo = rfft(tails / np.linalg.norm(tails[0]), SIZE) * wet
    side = np.array([[.5], [-.5]])
    direct = np.exp(1j * side * np.interp(hz, *np.transpose(phase_lead)))
    paths = (direct + echo) / np.sqrt(1 + wet ** 2)
    paths = paths / ((abs(paths) ** 2).mean(0) + .05) ** (even / 2)
    return irfft(rfft(x, SIZE) * paths * attenuation_scalar(side * read(port_tilt, hz)), SIZE)[:, :N]


def scene():
    _, turn, power, _, _ = shaft()
    drive = gear_drive()
    body = gears(turn, drive) + motor(turn, drive) + table()
    head = linkage_and_brushes(turn) + needle() + cloth()
    arm = gears(turn, drive) + bearings(turn, power) + background()
    parts = presser_lever() + foot_switch() + rubs() + scrapes()
    out = ports(body, 0.11, even=0.6) + ports(head, 5.9, even=.4)
    out += ports(arm, .1, even=0.49) + ports(parts, -5, even=.3)
    return out + free_brushes()


def roll_off(x):
    return signal.sosfilt(signal.butter(12, 15810, fs=SR, output="sos"), x)


def record(dry):
    return roll_off(dry)


dry = scene()
out = record(dry)
digitize_waveform(out)
```